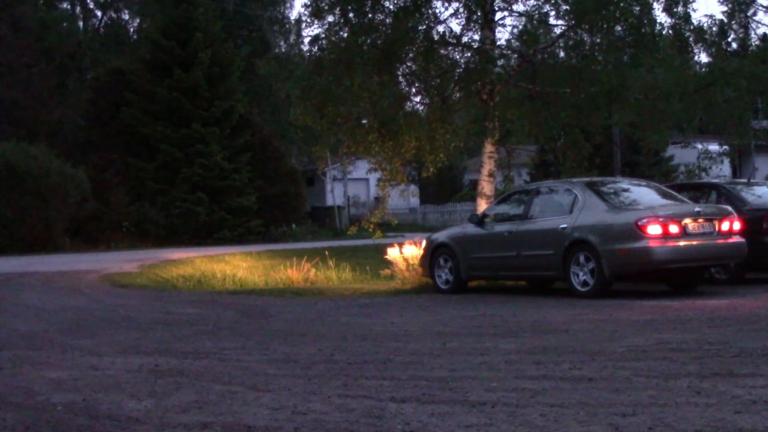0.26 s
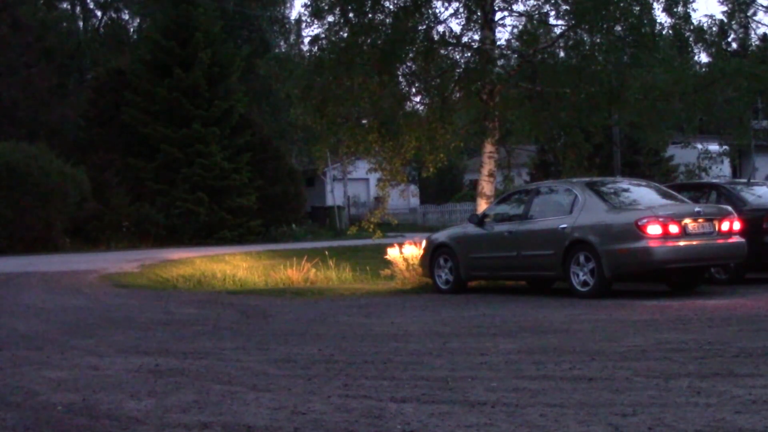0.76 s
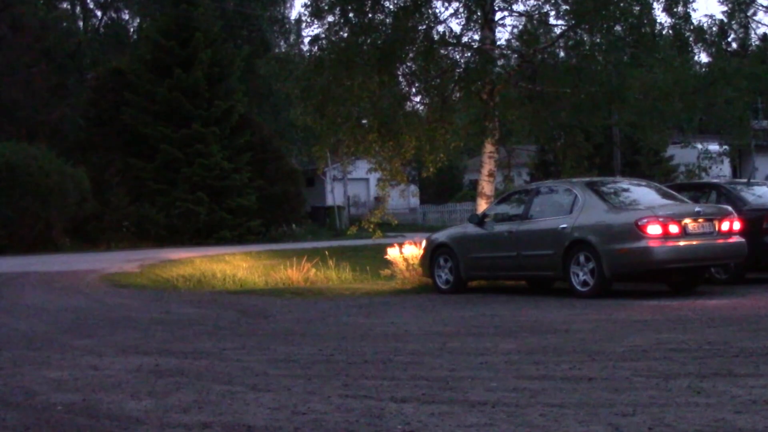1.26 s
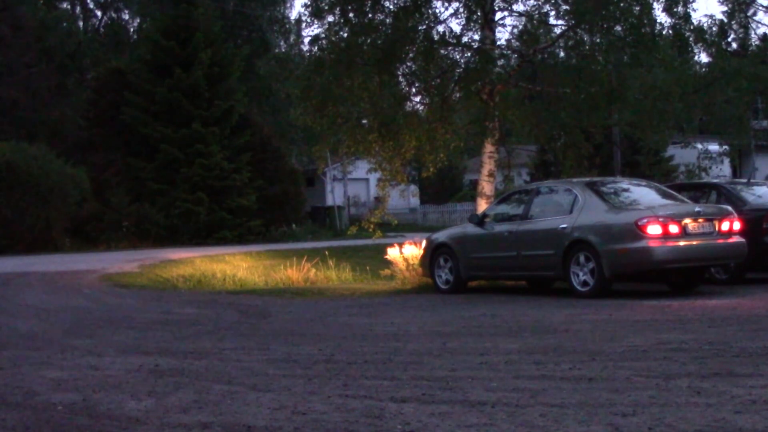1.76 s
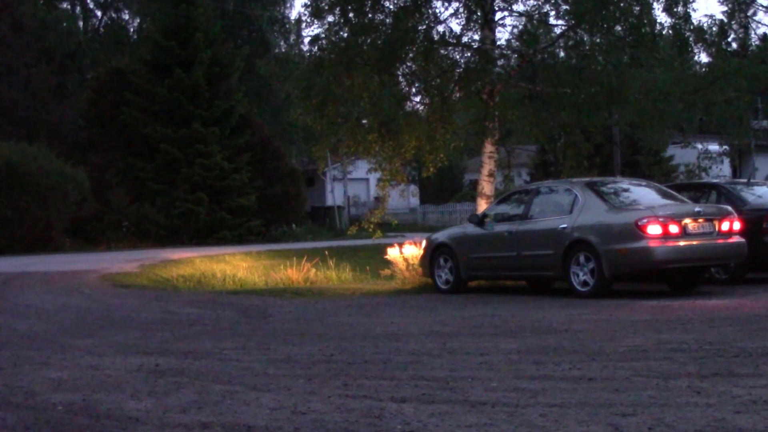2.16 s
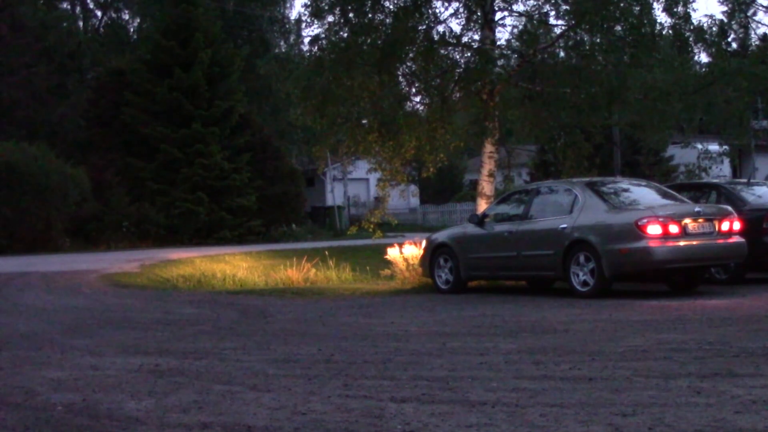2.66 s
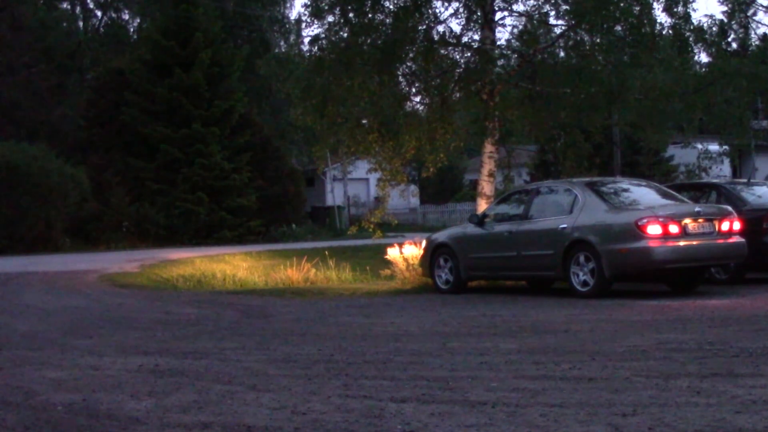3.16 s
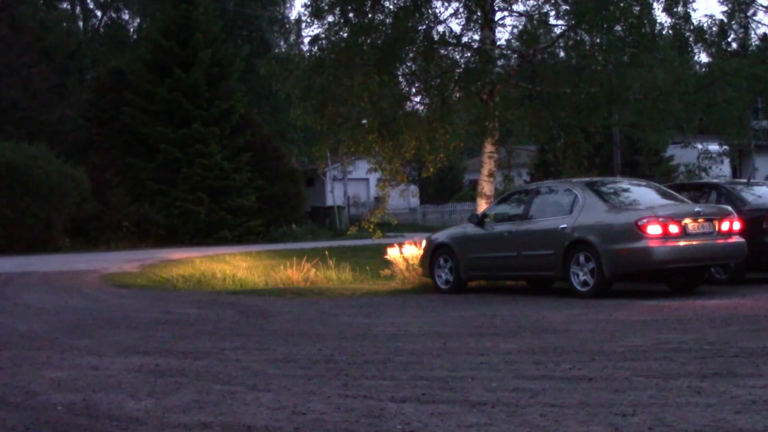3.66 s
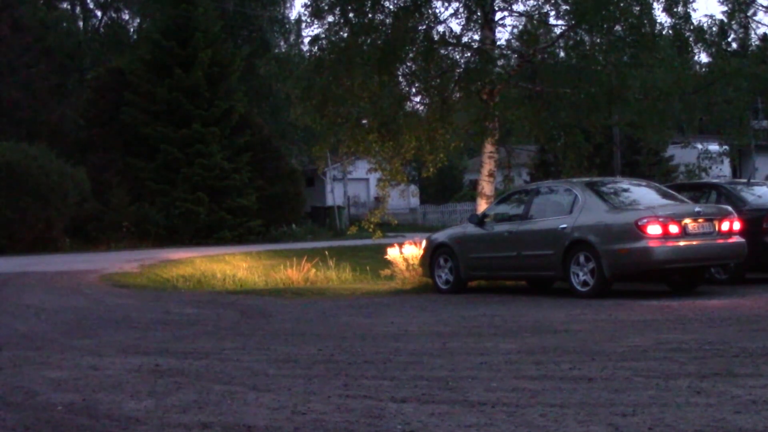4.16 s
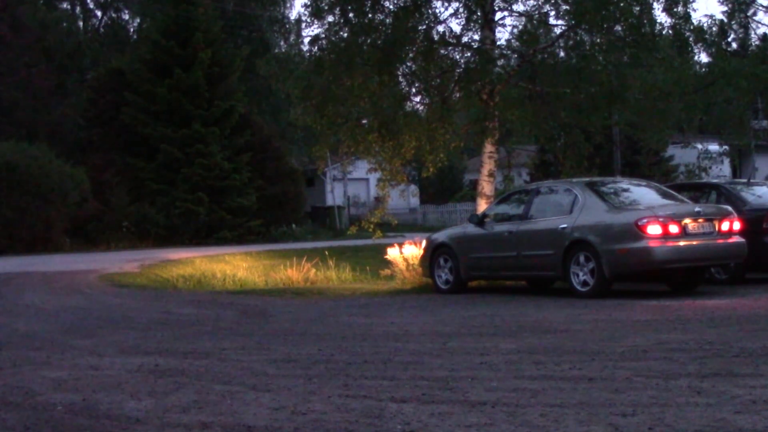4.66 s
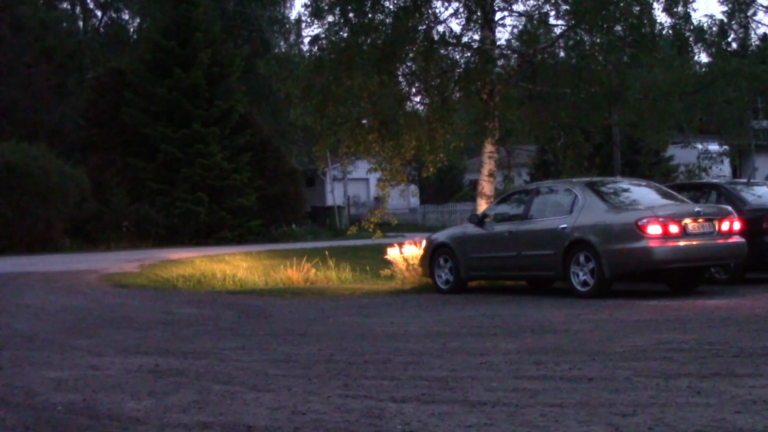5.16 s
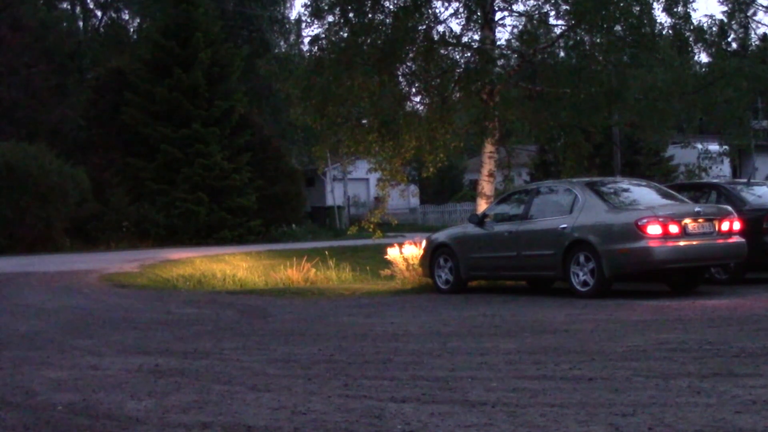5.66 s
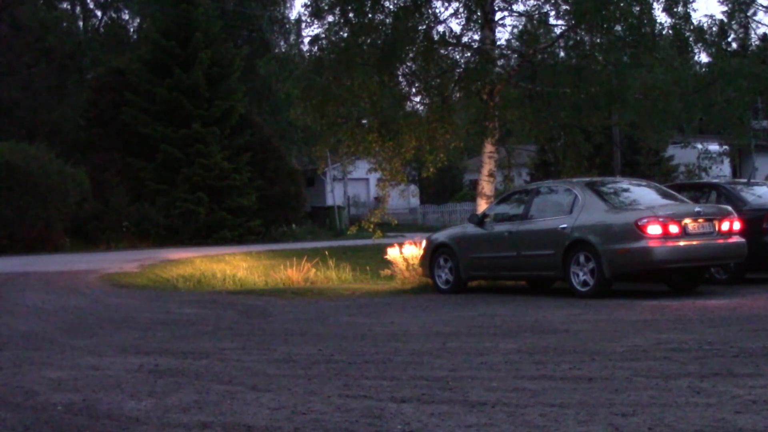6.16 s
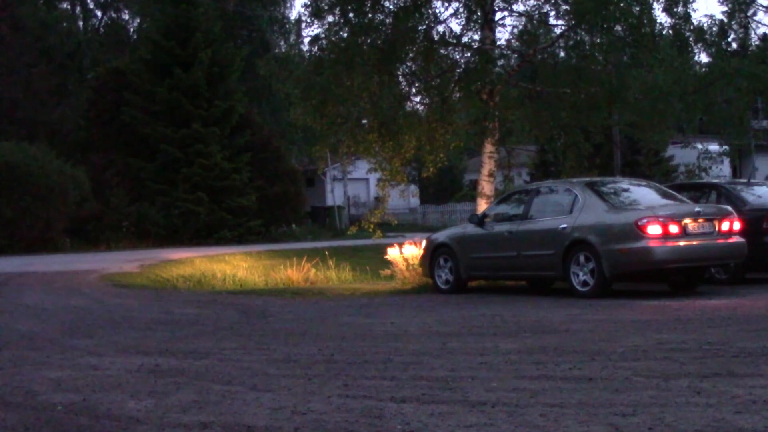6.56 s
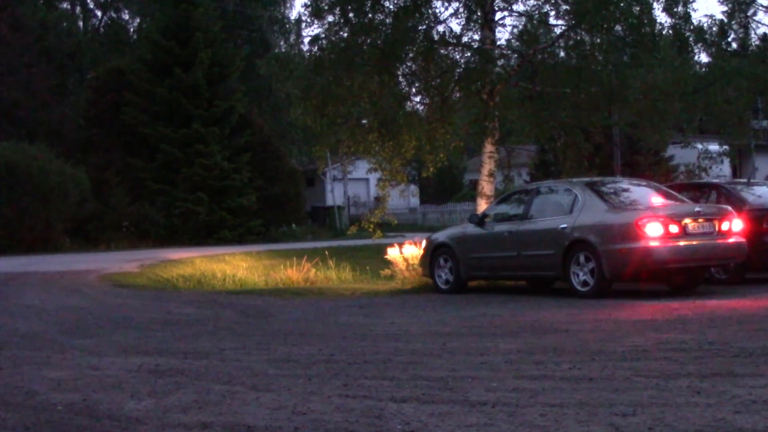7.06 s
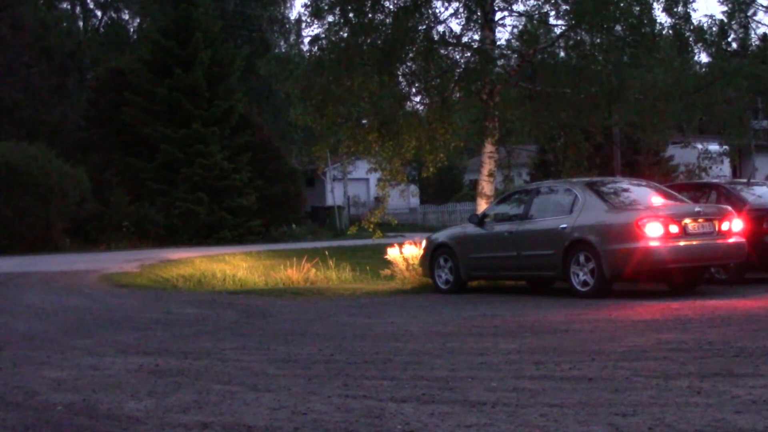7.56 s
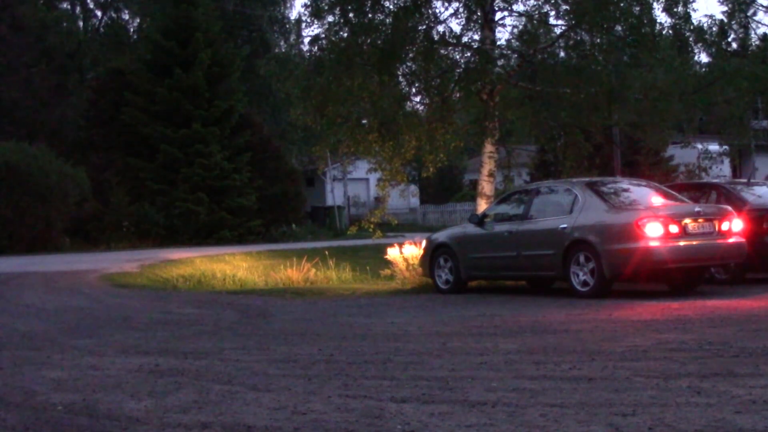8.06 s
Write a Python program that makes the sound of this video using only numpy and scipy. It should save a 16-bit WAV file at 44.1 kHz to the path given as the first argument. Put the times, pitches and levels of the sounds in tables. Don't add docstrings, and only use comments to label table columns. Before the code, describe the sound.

A six-cylinder car with a loud open exhaust idles on a gravel yard among trees, heard by one outdoor microphone. From 0 to 3 s the idle is low, rough and slightly hunting, a bassy throb near 57 firings per second with uneven metallic rasp, little barks and a loose rattle. Thin falling whistles open the birdsong, a buzzy six-chirp trill runs from 0.6 to 1.4 s, farther low chips answer, and a rising call comes at 1.8 s. A sharp dry tick lands at 1.1 s. Around 3.1 s the engine takes load: pitch steps up to about 62, eases briefly, then pulls fullest near 4 s and holds as a thicker, smoother drone to 8.3 s. Leaf gusts and twig snaps crackle faintly from 3.3 to 5.3 s, with ticks at 5.4 and 6.3 s. Very faint birds return near 7.5 s over soft outdoor hush and hiss.

```python
import sys
import numpy as np
from scipy import signal
from scipy.fft import rfft, irfft
from scipy.io import wavfile
from scipy.ndimage import uniform_filter1d

SR = 44100
rng = np.random.default_rng(int(sys.argv[2]) if len(sys.argv) > 2 else 0)


def invert_db(level):
    return 10 ** (np.asarray(level, dtype=float) / 20)


def materialize(psi):
    bounded = np.clip(np.atleast_2d(psi).T, -1, 1)
    quanta = np.round(bounded * 32767).astype(np.int16)
    wavfile.write(sys.argv[1], SR, quanta)


N = 366471
TIME = np.arange(N) / SR


def unit(x, db=0):
    return x * invert_db(db) / np.sqrt(np.mean(x ** 2))


def band(x, hz, width_hz):
    return signal.lfilter(*signal.iirpeak(hz, hz / width_hz, fs=SR), x)


def ring(x, modes):
    return sum((-1) ** k * invert_db(db) * band(x, hz, width_hz) for k, (hz, width_hz, db) in enumerate(modes))


def walk(rate_hz):
    k = int(SR / rate_hz)
    steps = np.repeat(rng.standard_normal(N // k + 1), k)
    return unit(uniform_filter1d(uniform_filter1d(steps, k), k)[:N])


def clicks(at, sizes):
    out = np.zeros(N + 2)
    i = np.clip(at.astype(int), 0, N)
    np.add.at(out, i, sizes * (1 - at % 1))
    np.add.at(out, i + 1, sizes * (at % 1))
    return out[:N]


# frequency in Hz, density in dB per Hz.
HUSH_COLOUR = [(30, -18.5), (70, -18.5), (150, -28.5), (210, -31), (400, -24), (800, -30), (1000, -34),
               (1600, -41.5), (2500, -49), (4000, -51.5), (6500, -56.5), (9000, -62.5), (12000, -59),
               (15500, -60)]


def hush():
    hz, db = np.transpose(HUSH_COLOUR)
    f = np.maximum(np.fft.rfftfreq(N, 1 / SR), 1)
    colour = invert_db(np.interp(np.log(f), np.log(hz), db)) * np.minimum(f / 45, 1) ** 3
    noise = irfft(rfft(rng.standard_normal(N)) * colour, N)
    return unit(noise, -44) * invert_db(0.6 * walk(5.7))


# middle in seconds, half length in seconds, level in dB.
GUSTS = [
    (0.595, 1.8, -63),
    (2.203, .18, -69),
    (3.45, 0.18, -62),
    (3.76, 0.11, -64.5),
    (4.217, 0.44, -68),
    (4.962, 0.23, -68),
    (6.214, 0.35, -69.5),
    (7.605, 0.6, -68),
]
CALM_DB = -84.5


def rustle():
    grains = rng.standard_normal(N) * invert_db(1.5 * walk(40))
    wind = invert_db(CALM_DB) + sum(invert_db(db) * np.exp(-((TIME - s) / half_s) ** 2) for s, half_s, db in GUSTS)
    return unit(band(band(grains, 3000, 1300), 3000, 1300)) * wind


# time in seconds, peak in dB, pitch in Hz.
SNAPS = [(3.3187, -51, 2600), (3.3506, -45.5, 2000), (3.4386, -45.5, 2560), (3.4756, -46, 2590),
         (3.5067, -49.5, 2150), (3.6395, -48.5, 2490), (3.8882, -49, 2030), (3.9665, -48, 2090),
         (3.9965, -46.5, 2300), (4.0241, -45, 2600), (4.3845, -57.5, 2030), (4.5349, -49, 2110),
         (4.5662, -52.5, 2000), (4.7295, -50.5, 2660), (4.8255, -48.5, 2270), (4.857, -41.5, 2450),
         (4.9736, -45, 2220), (5.0727, -50.5, 2050), (5.141, -50.5, 2100), (5.168, -47.5, 2680),
         (5.261, -48.5, 2180)]
SNAP_DECAY_S, SNAP_WIDTH_HZ, SNAP_DB = 0.011, 300, -8


def snaps():
    out = np.zeros(N)
    size = int(.08 * SR)
    for s, db, hz in SNAPS:
        burst = unit(band(rng.standard_normal(size), hz, SNAP_WIDTH_HZ), db + SNAP_DB)
        out[int(s * SR):][:size] += burst * np.exp(-TIME[:size] / SNAP_DECAY_S)
    return out


# time in seconds, peak in dB.
TICKS = [
    (1.11, -31.5),
    (4.0225, -47.5),
    (4.948, -52),
    (5.439, -42.5),
    (6.13, -53),
    (6.2698, -42),
    (6.908, -48),
]
TICK_DECAY_S = 0.0048


def ticks():
    s, db = np.transpose(TICKS)
    burst = signal.lfilter([1], [1, -np.exp(-1 / (TICK_DECAY_S * SR))], clicks(s * SR, invert_db(db - 13.0)))
    return band(burst * rng.standard_normal(N), 3000, 4000)


def settle(since_s, from_hz, to_hz, time_s):
    return to_hz + (from_hz - to_hz) * np.exp(-since_s / time_s)


# phrase start in seconds, first pitch in Hz.
PHRASES = [(.05, 4350), (.385, 4270)]
# start in seconds, length in seconds, level in dB.
WHISTLES = [(0.053, 0.078, -67), (0.111, 0.085, -58), (0.19, 0.11, -62), (0.38, 0.044, -59),
            (.435, 0.068, -59), (0.528, .125, -65), (0.64, .14, -70), (0.776, .18, -75)]
WHISTLE_SINK_S, WHISTLE_REST_HZ, WHISTLE_ROUGH_HZ = .075, 4050, 45


def whistles():
    notes = []
    for s, length_s, db in WHISTLES:
        start_s, first_hz = max(row for row in PHRASES if row[0] <= s + length_s / 2)
        ends_s = np.array([s, s + length_s]) - start_s
        from_hz, to_hz = settle(ends_s, first_hz, WHISTLE_REST_HZ, WHISTLE_SINK_S)
        notes.append((s, length_s, from_hz, to_hz, db, WHISTLE_ROUGH_HZ, 0))
    return notes


# start in seconds, length in seconds, level in dB.
TRILL = [(0.631, 0.051, -47), (0.768, 0.067, -47), (0.925, 0.054, -42.5), (1.064, 0.062, -43.5),
         (1.201, 0.082, -43), (1.357, 0.071, -44.5)]
CHIRP_FIRST_HZ, CHIRP_LAST_HZ, CHIRP_CLIMB_S = 3550, 3790, 0.36
CHIRP_RISE_HZ, CHIRP_ROUGH_HZ, CHIRP_BUZZ = 110, 155, .9


def trill():
    notes = []
    for s, length_s, db in TRILL:
        hz = settle(s - TRILL[0][0], CHIRP_FIRST_HZ, CHIRP_LAST_HZ, CHIRP_CLIMB_S)
        from_hz, to_hz = hz - CHIRP_RISE_HZ / 2, hz + CHIRP_RISE_HZ / 2
        notes.append((s, length_s, from_hz, to_hz, db, CHIRP_ROUGH_HZ, CHIRP_BUZZ))
    return notes


# start in seconds, length in seconds, from Hz, to Hz, level in dB.
CALLS = [
    (0.495, 0.042, 4050, 4030, -48),
    (1.6, .053, 6300, 5920, -61),
    (1.636, .074, 7800, 7600, -61),
    (1.819, 0.125, 3200, 4060, -48),
    (1.903, 0.07, 4300, 4630, -53.5),
    (7.462, 0.06, 4730, 4250, -62),
    (7.477, 0.055, 4020, 3950, -63),
    (7.53, 0.054, 4030, 5100, -62.5),
    (7.705, 0.095, 3920, 3780, -63.5),
]
CALL_ROUGH_HZ, ROUGH_PER_GLIDE, GLIDE_BUZZ = 80, .12, .25


def calls():
    notes = []
    for s, length_s, from_hz, to_hz, db in CALLS:
        glide_hz = abs(to_hz - from_hz)
        rough_hz = CALL_ROUGH_HZ + ROUGH_PER_GLIDE * glide_hz
        notes.append((s, length_s, from_hz, to_hz, db, rough_hz, GLIDE_BUZZ * (glide_hz > 300)))
    return notes


# start in seconds, from Hz, to Hz, level in dB.
ANSWER = [(.31, 2720, 2570, -63), (.592, 2640, 2750, -62), (.678, 2790, 2540, -54), (.703, 2830, 3060, -58),
          (.83, 2420, 2610, -58), (1.001, 2930, 2950, -62), (1.117, 2750, 2670, -60),
          (1.147, 3110, 2970, -59), (1.29, 2770, 3040, -59), (1.32, 2470, 2640, -56),
          (1.43, 2820, 3030, -56), (1.515, 2760, 2600, -56), (2.02, 2510, 2580, -60)]
CHIP_S, CHIP_ROUGH_HZ = 0.0336, 170


def answer():
    return [(s, CHIP_S, from_hz, to_hz, db, CHIP_ROUGH_HZ, 0) for s, from_hz, to_hz, db in ANSWER]


BUZZ_HZ, ECHO_S, ECHO_DB = 105, 0.48, -9


def birds():
    out = np.zeros(N)
    for s, length_s, from_hz, to_hz, db, rough_hz, buzz in whistles() + trill() + calls() + answer():
        u = np.linspace(0, 1, int(length_s * SR))
        shiver = np.tanh(unit(uniform_filter1d(rng.standard_normal(SR // 2), size=36)))[:len(u)]
        pitch_hz = from_hz + (to_hz - from_hz) * u + 1.5 * rough_hz * shiver
        tone = np.sin(2 * np.pi * np.cumsum(pitch_hz) / SR)
        chops = np.cumsum(BUZZ_HZ * (1 + .5 * shiver[::-1])) / SR + rng.random()
        chop = 1 - buzz + buzz * np.cos(2 * np.pi * chops)
        swell = np.sin(np.pi * u ** (1.1 + buzz ** 2)) ** .6
        out[int(s * SR):][:len(u)] += np.sqrt(2) * invert_db(db) * swell * chop * tone
    echo = rng.standard_normal(SR // 2) * np.exp(-np.log(1000) * TIME[:SR // 2] / ECHO_S)
    return out + invert_db(ECHO_DB) * signal.fftconvolve(out, echo / np.sqrt(np.sum(echo ** 2)))[:N]


def overtone(firings, k, lag=0):
    return np.sqrt(2) * np.cos(k * (2 * np.pi * firings + np.pi) + np.pi - .3 * (k * k - 1) - lag)


# frequency in Hz, rms in dB at full load.
PASS_1 = [(56, -25.2), (57.1, -24), (57.8, -22.3), (60.1, -21.5), (61.2, -19.5), (62.2, -16.7), (63, -15.3),
          (64.1, -14)]
PASS_2 = [(112, -28), (114, -30), (115.2, -35), (117, -29), (122.5, -17), (124.4, -20.5), (126, -23),
          (128.3, -25.5)]
PASS_3 = [(168, -38.5), (173, -40.5), (180, -44), (184, -51), (187, -47.5), (191, -54), (193, -56)]
PASS_4 = [(224, -49), (228, -43), (231, -40.5), (241, -32), (244.5, -18.5), (248.5, -26), (252, -29.5),
          (257, -33)]
LOAD_GAIN_DB = [0, 8, 0, 10]


def firing_levels_db(hz, load):
    passes = zip((PASS_1, PASS_2, PASS_3, PASS_4), LOAD_GAIN_DB)
    return [np.interp(k * hz, *np.transpose(line)) + gain_db * (load - 1)
            for k, (line, gain_db) in enumerate(passes, 1)]


FOURTH_NOTE_HZ, FOURTH_LEAD_RAD = 241, 2.3


def drone(firings, hz, lines_db):
    lead = FOURTH_LEAD_RAD * np.clip((FOURTH_NOTE_HZ - 4 * hz) / 8, 0, 1)
    out = np.zeros(N)
    for k, db in enumerate(lines_db, 1):
        lag = -1.1 * (k == 3) - lead * (k == 4)
        out += invert_db(db + 0.21 * k * walk(14)) * overtone(firings, k, lag)
    return out


# multiple of firing rate, level in dB unloaded, level in dB loaded.
BANKS = [(.5, -72, -42), (1.5, -40.5, -30), (2.5, -64, -30)]


def bank_lines(firings, load):
    out = np.zeros(N)
    for k, free_db, loaded_db in BANKS:
        db = 1.8 * walk(12) + free_db + (loaded_db - free_db) * np.minimum(load, .88)
        out += invert_db(db) * overtone(firings, k, lag=2.55 - 1.1 * k - 1.6 * (k < 1))
    return out


# resonance in Hz, width in Hz, level in dB.
PIPE = [(50.5, 43, -6.5), (70.7, 22.8, 2), (81, 28.1, -2), (126.4, 39, -8), (158.5, 44, -14),
        (196.7, 26, -18.5), (242.6, 32, -15), (327.6, 70, -16.5)]


def scatter(at, chance, load):
    return unit(ring(clicks(at, chance), PIPE), -45.0) * invert_db(12.6 * load)


# frequency in Hz, width in Hz, rms in dB at the centre, share of the even blow.
TAIL = [(250.5, 16, -36.5, 0), (287, 11, -41, 1.4), (350, 9, -54, 0), (314, 14, -42, -1.3),
        (435, 12, -51, 1.1), (394, 12, -58, .5), (486, 10, -60, .6), (508, 12, -60, 2.1), (578, 12, -61, 1),
        (66, 18, -44, 0), (415, 10, -58, 0), (543, 12, -63, 1)]
BANK_STEP, BANK_EARLY_S, UPPER_LOAD_DB = .22, .0006, 16


def tail_pipe(at, strength, chance, count, hz, load):
    uneven = clicks(at, strength - strength.mean() + .05 * chance)
    uneven = uneven + clicks(at - BANK_EARLY_S * SR, BANK_STEP * (-1.) ** count)
    even = -clicks(at, np.ones(len(at))) / 6
    tail = np.zeros(N)
    for k, (f, width_hz, db, share) in enumerate(TAIL):
        level = invert_db(db + (f > 340) * UPPER_LOAD_DB * (load - .57))
        tail += (-1) ** k * level * band(band(uneven + share * even, f, width_hz), f, width_hz)
    cycle = int(at[6] - at[0])
    tail[:cycle] += (tail[cycle:2 * cycle] - tail[:cycle]) * np.linspace(1, 0, cycle) ** .3
    return tail * SR / (np.sqrt(2) * hz / 6)


# time in seconds, peak in dB.
BARKS = [(0.393, -34), (1.125, -37.5), (1.441, -40), (1.532, -38.5), (2.189, -35.5), (2.4, -31),
         (2.929, -34), (3.036, -36), (3.524, -33), (3.675, -34.5), (3.959, -35.5), (4.038, -32),
         (4.259, -31.5), (4.901, -35), (5.373, -38), (5.757, -32), (6.155, -34), (6.373, -32.5),
         (6.499, -37), (6.783, -37), (7.055, -34), (7.513, -33.5), (7.645, -31.5), (7.897, -36),
         (7.996, -35)]
BARK_OVER_DB = 37


def gas_gate(at, firings, rasp_db, chance, count, load):
    puff_db = rasp_db * np.clip(2.6 - 2.8 * np.interp(at / SR, TIME, load), .15, .7) + .7 * chance
    for s, db in BARKS:
        puff_db[np.argmin(abs(at / SR - s - .01))] += db + BARK_OVER_DB
    puff_db = puff_db[np.clip((firings + .2).astype(int), 0, count[-1])]
    decay = .45 + np.exp(-((firings + .2) % 1) / .3)
    return uniform_filter1d(invert_db(puff_db) * decay, size=100)


ALIKE = .7


def gas_noise(firings):
    cycle = np.interp(firings / 6 % 1, np.linspace(0, 1, 1500), rng.standard_normal(1500))
    return ALIKE * unit(cycle, -5) + np.sqrt(1 - ALIKE ** 2) * rng.standard_normal(N)


# frequency in Hz, width in Hz, level in dB.
SHELL = [(430, 23, 1.5), (504, 55, -4.5), (576.4, 24, 0), (611, 50, -7), (692.4, 25, 1.5), (748.5, 26, 1),
         (813.5, 14.4, 4), (911, 29, -5.5), (1061, 7.2, -11), (1361, 27, -16), (1820, 14, -16.5)]


def shell_rasp(gas, gate, at, chance, load):
    low = [row for row in SHELL if row[0] < 640]
    high = [row for row in SHELL if row[0] > 640]
    upper = ring(gate * gas, high) * gate ** 0.13 * invert_db(-9 * (load - 0.94))
    lower = ring(gate ** 0.32 * gas + 5 * clicks(at, invert_db(2.9 * chance)), low)
    rasp = unit(upper + 0.74 * lower, -46.0) * invert_db(1.0 * load)
    return (rasp + (1.1 * load - .35) * band(rasp, 380, 220)) * invert_db(0.5 * walk(3.6))


SHIELD_LATE_S = .022


def heat_shield(gas, gate, load):
    late = np.roll(gate, int(SHIELD_LATE_S * SR)) ** 1.1
    rattle = unit(late * band(band(gas, 1102, 45), 1102, 90))
    return invert_db(-57 + walk(3)) * np.clip(1.7 - load, 0, 1.1) * rattle


def bracket(gas, gate, fourth_db):
    return invert_db(-44) * invert_db(fourth_db) * unit(gate * band(band(gas, 1785, 70), 1785, 140))


def clatter(gate, load):
    noise = band(rng.standard_normal(N), 2200, 2500)
    return unit(np.minimum(gate, 1) * invert_db(.8 * walk(5)) * noise, -66) * invert_db(2.0 * load)


# time in seconds, firing rate in Hz.
SPEED = [(0, 57.8), (.72, 56.95), (1.1, 57.55), (1.85, 55.77), (2.36, 56.85), (2.6, 56.3), (2.99, 57.1),
         (3.16, 61.2), (3.27, 62.2), (3.66, 60.95), (3.97, 61.53), (4.14, 62.3), (4.62, 62.95),
         (5.1, 64.22), (5.9, 63.77), (6.86, 63.65), (7.6, 62.1), (8.31, 62.5)]
# time in seconds, load from 0 to 1.
LOAD = [
    (0, 0.63),
    (3.07, 0.64),
    (3.2, 0.93),
    (3.36, 0.74),
    (4.05, 1.03),
    (4.5, 0.88),
    (8.31, 0.84),
]
# ringing strength, rasp in dB.
CYLINDERS = [(.46, -5), (-.49, -10), (-.25, -10), (.14, -8), (-.22, 0), (.35, -3)]
START_FIRINGS = -.2


def engine():
    hz = uniform_filter1d(np.interp(TIME, *np.transpose(SPEED)), size=3000)
    load = np.interp(TIME, *np.transpose(LOAD))
    lines_db = firing_levels_db(hz, load)
    firings = np.cumsum(hz * (1 + 0.001987 * walk(14))) / SR + START_FIRINGS
    count = np.arange(int(firings[-1]))
    at = np.interp(count + .5, firings, TIME) * SR
    strength, rasp_db = np.array(CYLINDERS)[count % 6].T
    chance = rng.standard_normal((len(count), 3)).T
    pipes = drone(firings, hz, lines_db) + bank_lines(firings, load) + scatter(at, chance[0], load)
    pipes = pipes + tail_pipe(at, strength, chance[1], count, hz, load)
    gate = gas_gate(at, firings, rasp_db, chance[2], count, load)
    gas = gas_noise(firings)
    rasp = shell_rasp(gas, gate, at, chance[2], load)
    loose = heat_shield(gas, gate, load) + bracket(gas, gate, lines_db[3])
    return pipes + rasp + loose + clatter(gate, load)


def scene():
    return (hush() + rustle() + snaps() + ticks() + birds() + engine())[None]


def band_limit(x):
    return signal.sosfilt(signal.butter(12, 15740, fs=SR, output="sos"), x)


def record(dry):
    return band_limit(dry)


dry = scene()
out = record(dry)
materialize(out)
```